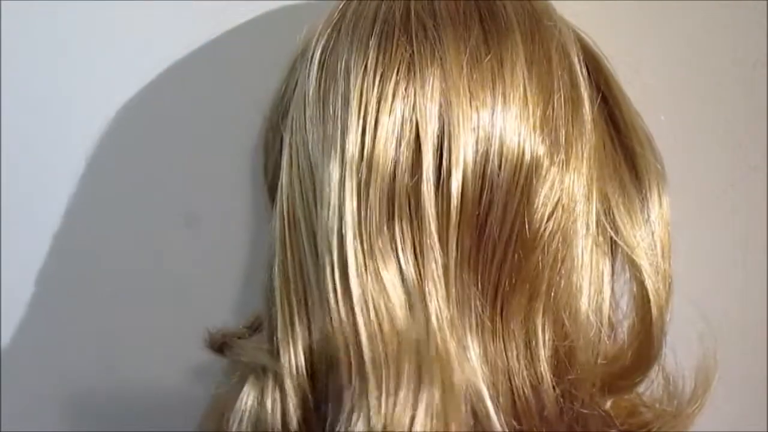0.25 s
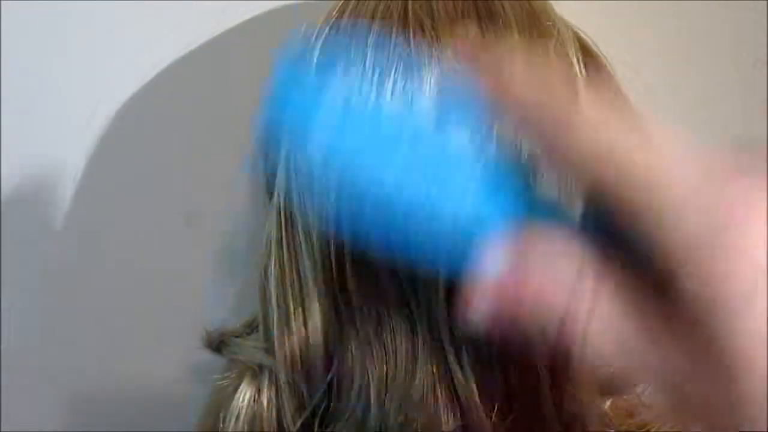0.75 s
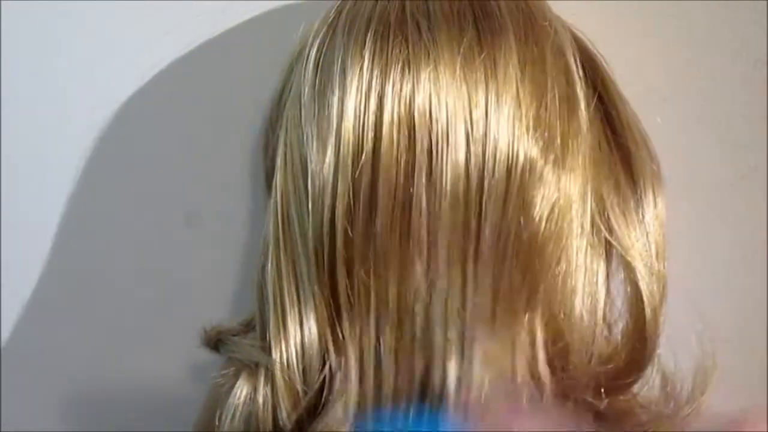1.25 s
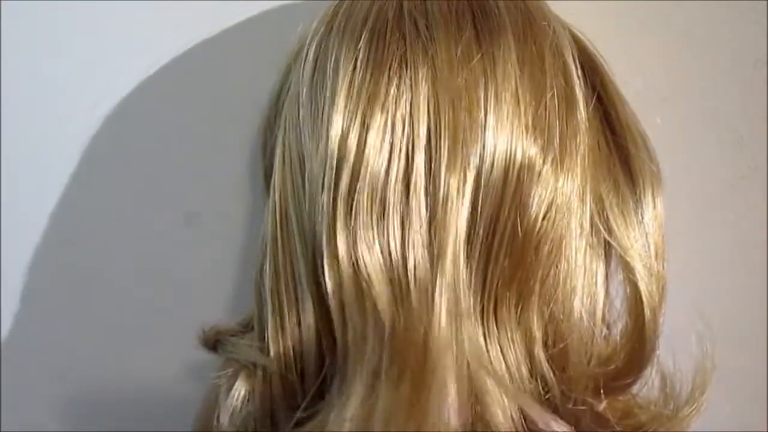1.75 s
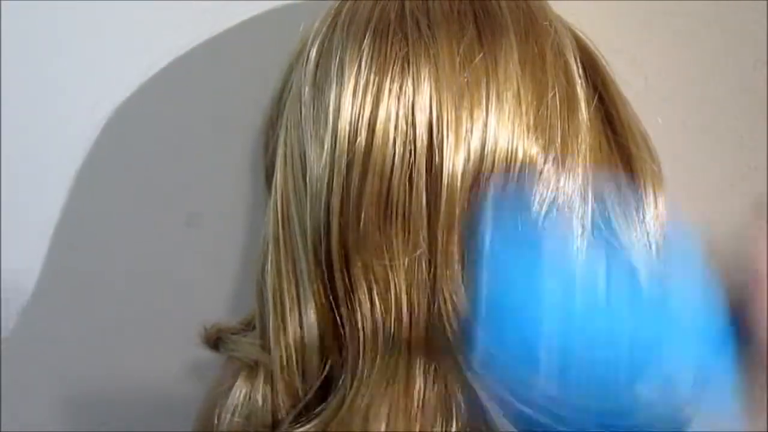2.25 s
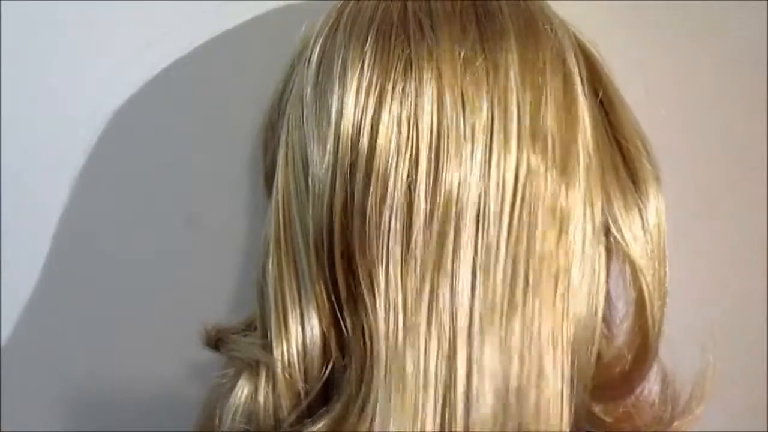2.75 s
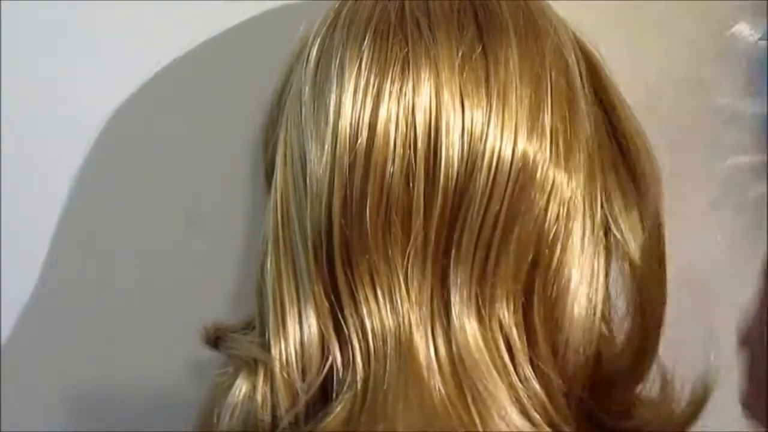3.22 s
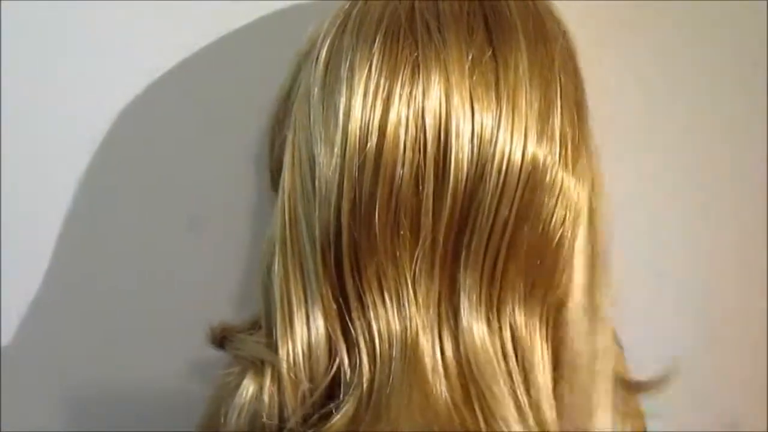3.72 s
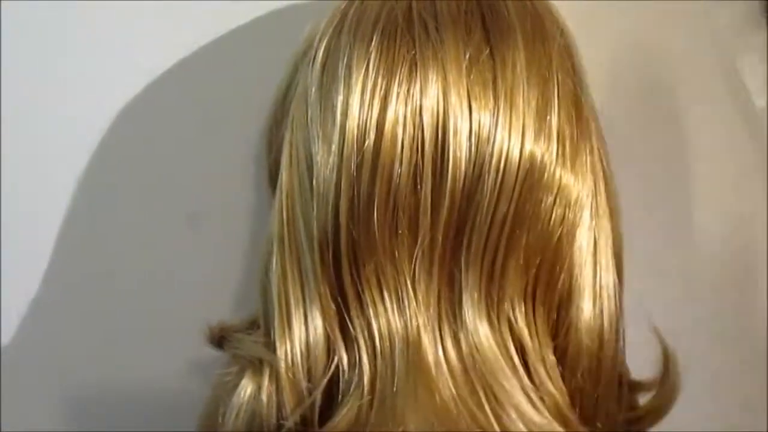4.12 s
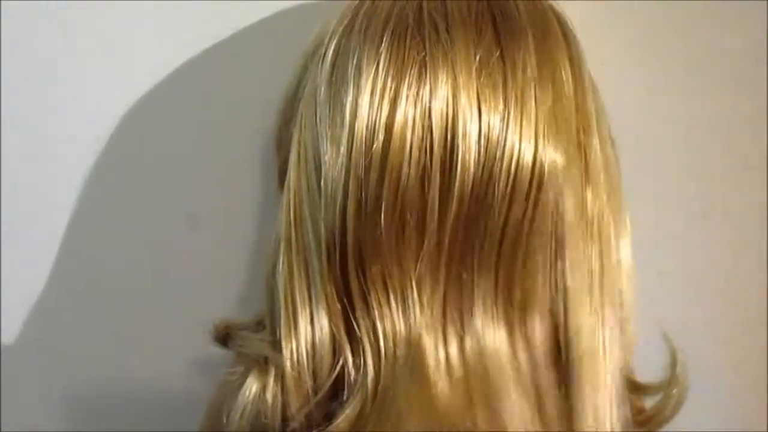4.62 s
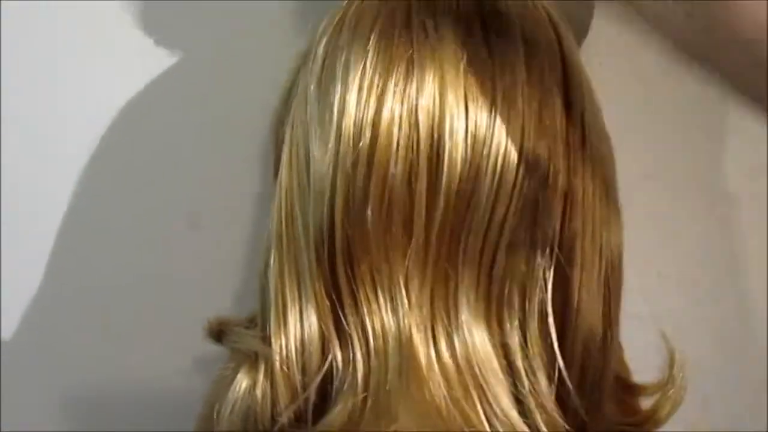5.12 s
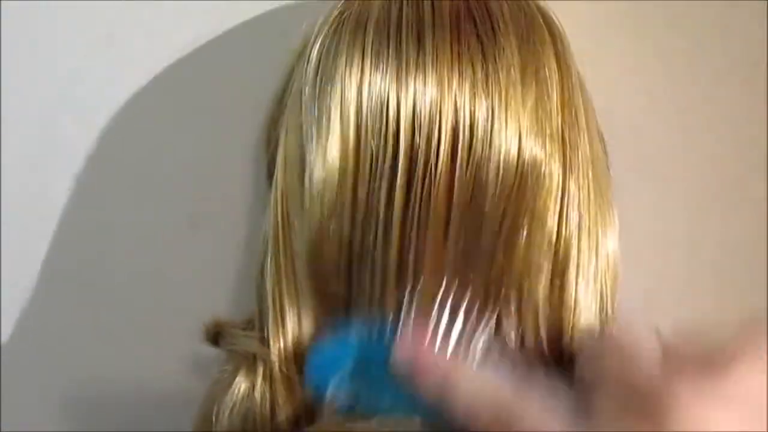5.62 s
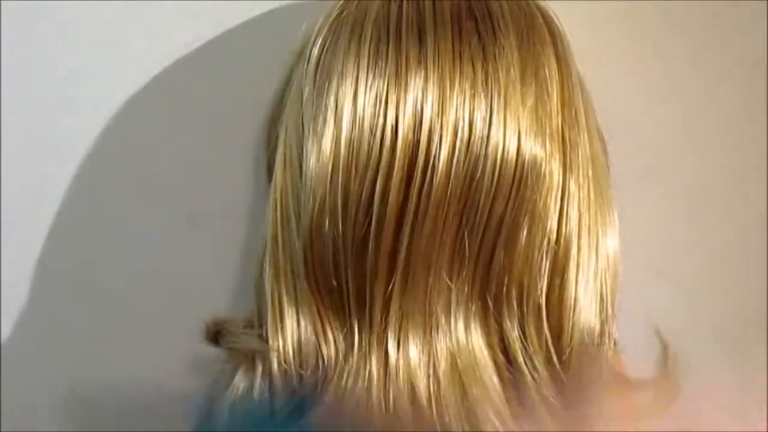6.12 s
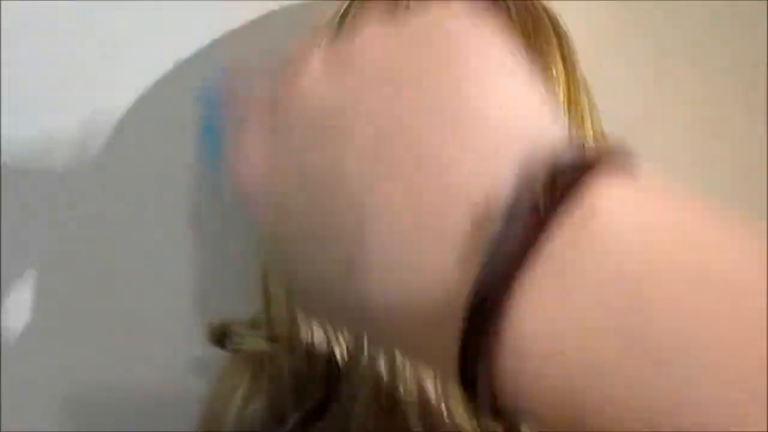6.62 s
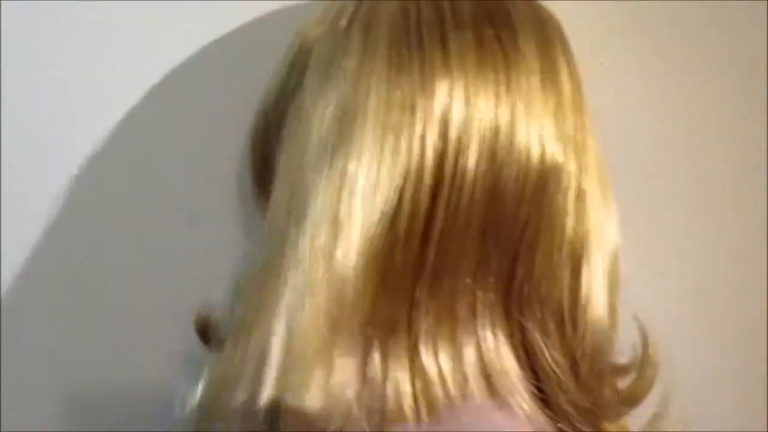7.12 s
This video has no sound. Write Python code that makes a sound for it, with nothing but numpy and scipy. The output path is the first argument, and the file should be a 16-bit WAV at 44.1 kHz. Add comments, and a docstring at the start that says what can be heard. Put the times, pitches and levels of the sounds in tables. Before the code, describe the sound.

Close, dry brushing of artificial hair: soft crackly swishes, small snaps, low bumps of the head, sharp clicks and a thud in a quiet room.

```python
"""A brush stroke already under way hisses through a doll's synthetic hair, close by in a small quiet room.
More strokes follow: slipping fibres hiss as filtered random impulses, snagged pins snap free as short
noise bursts and the tugged head rumbles as low noise. Around the strokes hard plastic knocks and wire
pins click, ringing as decaying sines under a noise crack. One strong thud lands on the table, later two
faint ones. Steady air noise and two faint hums lie beneath."""
import sys
import numpy as np
from scipy import signal
from scipy.fft import rfft, irfft
from scipy.io import wavfile

SR = 44100
rng = np.random.default_rng(int(sys.argv[2]) if len(sys.argv) > 2 else 0)


def store_wav(level_fs):
    """Save 16-bit WAV to argv[1]."""
    pcm = np.round(np.clip(np.atleast_2d(level_fs), -1, 1) * 32767)
    wavfile.write(sys.argv[1], SR, pcm.T.astype(np.int16))


N = 324576
TIME = np.arange(N) / SR          # s
RING_TIME = TIME[:SR // 2]        # s, the half second given to each short sound
CUTOFF_HZ = 15900                 # nothing much is heard above this


# Strokes of the brush. Each row: start in seconds, length in seconds, swish of the pins over the scalp
# at its fastest in relative dB, pull on the head as the pins bite in relative dB.
BRUSH_STROKES = [(0, 0.25, -74, -55), (.99, 0.6, -71, -49.5), (2.51, 0.525, -69, -50),
                 (3.599, 0.3, -65, -48.5), (4.381, 0.29, -66, -41.5), (5.276, 0.71, -72.5, -43.5),
                 (6.492, 0.29, -91, -33), (6.933, 0.45, -72, -50.5)]


def brush_motion():
    """Gains of swish and pull: the brush is fastest near mid-stroke and tugs hardest as it bites."""
    bite_s, leave_s = 0.021, 0.05            # the pins sink in; they leave the hair
    speed_up_s, slow_down_s = 0.07, 0.11     # the swish comes and goes more gently than the pull
    fastest_point = 0.45                     # point along the stroke where the swish peaks, 0-1
    swell_db, ease_db = 6, 10.5              # per stroke length: swish away from its peak, pull from its bite
    speed, pull = np.zeros(N), np.zeros(N)
    for start, length, swish_db, pull_db in BRUSH_STROKES:
        along = np.clip((TIME - start) / length, 0, 1)
        swish_gain = from_db(swish_db - swell_db * abs(along - fastest_point))
        pull_gain = from_db(pull_db - ease_db * along)
        speed += held(start, length, speed_up_s, slow_down_s) * swish_gain
        pull += held(start, length, bite_s, leave_s) * pull_gain
    return speed, pull


# Loose lengths of hair sliding over one another. Each row: start in seconds, length in seconds, hiss in dB.
HAIR_SLIDES = [(0, .14, -65.5), (0.277, 0.12, -64), (0.98, 0.12, -67), (1.294, 0.3, -66.5),
               (1.69, 0.061, -68), (1.96, 0.055, -58.5), (2.53, 0.46, -64.5), (2.777, 0.074, -67),
               (3.655, 0.29, -74), (4.45, 0.29, -66.5), (5.316, 0.66, -64), (6.76, 0.2, -70),
               (6.964, 0.41, -63)]


def sliding_lengths():
    """Gain of the hiss of the loose lengths: each slide rises, holds and dies away."""
    slides = [from_db(db) * held(start, length, rise=0.083, fall=0.058) for start, length, db in HAIR_SLIDES]
    return sum(slides)


# Colour of the swish over the scalp. Each row: frequency in Hz, density in relative dB per Hz.
SWISH_COLOUR = [(400, 9), (1200, 3.5), (2500, 1.5), (4000, 0), (8400, 5), (11500, -2), (15500, -30)]
# Resonances that colour the hiss of the loose lengths. Each row: centre in Hz, width in Hz, relative dB.
HAIR_RESONANCES = [(4600, 280, 2.5), (5500, 550, 3.5), (6300, 380, 4.5), (7030, 170, 4)]


def hair(speed, pull):
    """A broad swish over the scalp, a wandering hiss down the lengths, crackle where the brush pulls."""
    swish_gain = speed * from_db(2 + drift(40))
    swish = swish_gain * coloured(slips(per_s=8000, size_db=4.5), SWISH_COLOUR)

    lengths = 0
    for hz, width, db in HAIR_RESONANCES:
        b, a = signal.iirpeak(hz, hz / width, fs=SR)
        band = signal.lfilter(b, a, slips(per_s=6500, size_db=5.5))
        waver_db = 2.4 * drift(12) + 1.8 * drift(70)
        lengths = lengths + from_db(db + waver_db) * rms_one(band)
    hiss = sliding_lengths() * rms_one(lengths)

    snags = slips(per_s=130, size_db=2) * from_db(2.3 * drift(30))
    # every snag rattles the pin bed for a few milliseconds
    pin_noise = rng.standard_normal(len(RING_TIME)) * fade(0.02)
    pin_bed = coloured(pin_noise, [(600, 0), (2700, 0), (6000, -5), (9000, -16)])
    rattle = rms_one(signal.fftconvolve(snags, pin_bed)[:N])
    crackle = from_db(-4) * np.sqrt(speed * pull) * rattle
    return swish + hiss + crackle


# Pins snapping free of tangles. Each row: start in seconds, level in relative dB, favoured register in Hz.
PIN_SNAPS = [(1.0623, -35, 3440), (1.2706, -40.5, 9000), (2.534, -35, 1580), (2.5953, -32.5, 3170),
             (2.692, -24, 2600), (2.7001, -31, 3220), (2.7173, -26.5, 6200), (3.0005, -37, 2170),
             (4.461, -33, 2670), (4.48, -33.5, 2400), (4.5647, -34, 2140), (4.5774, -37, 4230),
             (4.6, -32.5, 4530), (4.616, -37, 4600), (5.229, -44, 6000), (5.399, -37.5, 3340),
             (5.4502, -37.5, 1990), (5.4999, -40, 1990), (5.528, -35.5, 4500), (5.833, -38.5, 2330),
             (6.483, -43, 3500), (6.491, -35.5, 1510), (6.954, -36.5, 3130)]
# Shared colour of the snaps. Each row: frequency in Hz, density in relative dB per Hz.
SNAP_SPECTRUM = [(200, 18.5), (700, 12), (1500, 4), (2700, -1.5), (4000, -5.5), (5200, -3.5), (8000, -8),
                 (11000, -12.5), (15500, -23.5)]


def pin_snaps():
    """A pin bends in a tangle and springs free; each favours its own register."""
    register_slope_db = 6.8      # per octave away from the favoured register
    out = np.zeros(N)
    for s, db, centre_hz in PIN_SNAPS:
        colour = [(hz, level - register_slope_db * abs(np.log2(hz / centre_hz)))
                  for hz, level in SNAP_SPECTRUM]
        snap = burst(colour, t60=0.024, tail_db=-10, tail_t60=0.12, tail_tilt_db=-4)
        add(out, s, from_db(db - 7) * snap)
    return out


# Brief swells of rustle and swish. Each row: middle in seconds, level in dB, centre in Hz,
# spread in time in seconds.
RUSTLE_SWELLS = [(1.155, -73, 9500, 0.026), (2.614, -52.5, 4640, .01), (2.954, -55.5, 1330, 0.015),
                 (3.543, -55.5, 3680, .012), (4.49, -53.5, 2400, 0.012), (4.625, -61, 5450, 0.016),
                 (5.016, -62, 714, 0.11), (5.36, -65, 4550, 0.011), (5.64, -65, 9500, 0.044),
                 (5.712, -53.5, 1070, .016)]


def rustles():
    """Brief swells of rustle and swish: random slips, each time in one broad register."""
    out = np.zeros(N)
    for s, db, hz, spread in RUSTLE_SWELLS:
        colour = [(hz / 2, -9), (hz, 0), (hz * 2, -13)]
        noise = coloured(slips(per_s=6000, size_db=2.5), colour)
        swell = np.exp(-0.5 * ((TIME - s) / spread) ** 2)
        out += from_db(db) * noise * swell
    return out


# Soft bumps of head and stand. Each row: start in seconds, peak of the swell in dB, pitch in Hz.
HEAD_BUMPS = [(0.189, -33.5, 57.4), (2.432, -41, 218.5), (2.471, -43, 225), (2.551, -34.5, 60),
              (2.605, -29.5, 62.6), (2.956, -36.5, 65), (4.256, -39, 222), (4.333, -37, 222.5),
              (4.739, -49, 221), (5.16, -38, 226.5), (5.24, -35, 62.6), (6.154, -36.5, 108),
              (6.487, -22.5, 75), (6.541, -28, 57), (6.66, -27.5, 59.7)]


def handling(pull):
    """The pull of the brush shakes the head; soft bumps swell and die at one pitch."""
    shake_colour = [(40, 1.5), (62, 16.5), (90, 10.5), (150, 2), (300, -35)]
    shake = coloured(rng.standard_normal(N), shake_colour)
    restless_pull = pull + from_db(-58.5)      # the head never stands quite still
    out = from_db(-2) * restless_pull * shake
    age = RING_TIME / 0.011                    # the bump peaks after 11 ms
    swell = age * np.exp(1 - age)
    for s, db, hz in HEAD_BUMPS:
        add(out, s, from_db(db) * swell * np.sin(2 * np.pi * hz * RING_TIME))
    return out


# Knocks on hollow plastic. Each row: start in seconds, level in relative dB, how strongly the broad face
# answers in dB, how freely the plastic rings in dB.
PLASTIC_KNOCKS = [(0.4474, -15, -5.5, 0), (2.108, -12, -1.5, -6.5), (2.149, -30, 2, -6.5),
                  (2.164, -31.5, 11.5, -6.5)]
# Modes of the plastic. Each row: frequency in Hz, level in relative dB, decay time t60 in seconds.
PLASTIC_MODES = [(230, -5, .15), (328, -14, .1), (495, -17, .08), (790, -9, .07), (1020, -11, .08),
                 (1370, -6, .06), (1450, -3, .07), (1545, -11, .08), (1990, -3, .07), (2185, -8, .06),
                 (2390, -10, .05), (2570, -11, .05), (3350, -17, .07), (5580, -15, .05)]
# Colour of the crack of a knock. Each row: frequency in Hz, density in relative dB per Hz.
KNOCK_SPECTRUM = [(150, 3.5), (250, 4), (600, -1.5), (1300, 2.5), (2300, -3), (3800, -15), (5600, -15),
                  (8000, -23), (15000, -57)]


def knocks():
    """Hollow plastic rings under a short crack; the spot struck decides how much its face joins in."""
    out = np.zeros(N)
    for s, db, face_db, ring_db in PLASTIC_KNOCKS:
        modes = [(hz, level + face_db * face_share(hz), t60) for hz, level, t60 in PLASTIC_MODES]
        colour = [(hz, level + face_db * face_share(hz)) for hz, level in KNOCK_SPECTRUM]
        crack = burst(colour, t60=0.077, tail_db=-19.5, tail_t60=0.27, tail_tilt_db=0.5)
        body = ring(modes, spread_db=2.5, low_hz=130, contact_hz=9000)
        add(out, s, from_db(db) * (from_db(ring_db) * body + from_db(-6) * crack))
    return out


def face_share(hz):
    """How far a frequency belongs to the broad face of the plastic, 0-1."""
    return np.exp(-3 * np.log2(hz / 1100) ** 2)


# Wire pins clicking on something hard. Each row: start in seconds, level in relative dB.
PIN_CLICKS = [(.440, -29), (0.447, -34), (2.107, -42), (2.14, -45), (2.158, -45), (6.022, -31),
              (6.0249, -31), (6.6171, -40)]
# Colour of the click. Each row: frequency in Hz, density in relative dB per Hz.
CLICK_SPECTRUM = [(200, 7.5), (600, -14), (2200, -2), (3100, -16), (3450, 0), (3800, -10), (4400, 0.5),
                  (5750, 0.5), (6600, -7.5), (11000, -14.5), (12900, -10.5), (13450, -8.5), (14100, -15),
                  (15500, -17)]
# Pins that sing on after a click. Each row: frequency in Hz, level in relative dB, decay time t60 in seconds.
SINGING_PINS = [(4480, -16, .17), (5670, -16, 0.15), (13450, -25, 0.13), (13700, -24, .17)]


def clicks():
    """The bed of wire pins rings briefly and brightly, a few modes singing on."""
    out = np.zeros(N)
    for s, db in PIN_CLICKS:
        sing = ring(SINGING_PINS, spread_db=1.5, low_hz=1500, contact_hz=15500)
        tick = burst(CLICK_SPECTRUM, t60=0.047, tail_db=-7.5, tail_t60=0.15, tail_tilt_db=-1)
        add(out, s, from_db(db) * (tick + sing))
    return out


# The brush back clacking against the head. Each row: start in seconds, level in relative dB.
BRUSH_CLACKS = [(6.6161, -30), (6.6565, -26), (6.6779, -26.5)]
# Colour of the clack. Each row: frequency in Hz, density in relative dB per Hz.
CLACK_SPECTRUM = [(400, -13), (900, -7.5), (1800, -3), (2750, 5), (3300, 1), (4000, -4), (5200, -7),
                  (8000, -17.5), (15000, -45)]


def clacks():
    """Small, stiff plastic answers with a dry crack."""
    out = np.zeros(N)
    for s, db in BRUSH_CLACKS:
        clack = burst(CLACK_SPECTRUM, t60=0.029, tail_db=-16.5, tail_t60=0.18, tail_tilt_db=-2.5)
        add(out, s, from_db(db) * clack)
    return out


# Thuds on the table. Each row: start in seconds, level in relative dB.
TABLE_THUDS = [(3.4208, -15.5), (6.92, -53), (6.949, -45)]
# Modes of the table top. Each row: frequency in Hz, level in relative dB, decay time t60 in seconds.
TABLE_MODES = [(199, -10, 0.13), (280, -8, 0.14), (377, 0, 0.11), (468, -7, 0.098), (581, -9, 0.18),
               (716, -16, 0.18), (818, -2, 0.085), (991, -12, 0.12), (1104, -20, 0.17), (1303, -11, 0.12),
               (1480, -25, 0.15)]
# Colour of the crack of a thud. Each row: frequency in Hz, density in relative dB per Hz.
THUD_SPECTRUM = [(120, -9.5), (300, -2.5), (700, 3), (1300, -5), (1800, -12.5), (2500, -15.5),
                 (4000, -34.5), (7000, -37.5), (13000, -50)]


def thuds():
    """One short push on the table top, which answers with low, close modes."""
    out = np.zeros(N)
    age = (RING_TIME - 0.0011) / 0.00025      # the push swings through zero at 1.1 ms
    push = age * np.exp(-age ** 2 / 2)
    for s, db in TABLE_THUDS:
        crack = burst(THUD_SPECTRUM, t60=0.085, tail_db=-21, tail_t60=0.29, tail_tilt_db=-3)
        body = ring(TABLE_MODES, spread_db=4.5, low_hz=231, contact_hz=3500)
        add(out, s, from_db(db) * (from_db(2) * push + from_db(1.5) * body + from_db(2.5) * crack))
    return out


# Colour of the air noise. Each row: frequency in Hz, density in relative dB per Hz.
AIR_SPECTRUM = [(12, -36.5), (20, -1), (67, -1), (88, -22), (123, -3.5), (146, -17), (210, -11.5),
                (277, -18), (328, -17.5), (367, -19), (513, -21), (1190, -25), (3250, -34.5), (3530, -35),
                (16000, -50.5)]
# Steady room hums. Each row: frequency in Hz, rms level in dB.
ROOM_HUMS = [(27, -54.5), (120, -61.5)]


def room_tone():
    """Steady air noise and faint hums."""
    air = from_db(-51) * coloured(rng.standard_normal(N), AIR_SPECTRUM)
    hums = sum(from_db(db) * np.sqrt(2) * np.sin(2 * np.pi * hz * TIME) for hz, db in ROOM_HUMS)
    return air + hums


def slips(per_s, size_db):
    """Fibres slip at random, a few of them much harder; rms 1."""
    hardness = np.minimum(rng.exponential(1, N), 3)
    sizes = from_db(size_db * hardness) * rng.choice([-1, 1], N)
    return rms_one(sizes * (rng.random(N) < per_s / SR))


def burst(spectrum, t60, tail_db, tail_t60, tail_tilt_db):
    """Crowded modes of a contact die fast; the room holds them longer, tilted per octave."""
    direct, scattered = rng.standard_normal((2, len(RING_TIME)))
    in_room = [(hz, db + tail_tilt_db * np.log2(hz)) for hz, db in spectrum]
    contact = coloured(direct * fade(t60), spectrum)
    tail = coloured(scattered * fade(tail_t60), in_room)
    return contact + from_db(tail_db) * tail


def ring(modes, spread_db, low_hz, contact_hz):
    """One blow sets the modes ringing; a soft contact limits the top, small size the bass."""
    signs = (-1) ** np.arange(len(modes))
    strengths = signs * from_db(spread_db * rng.standard_normal(len(modes)))
    rings = sum(strength * from_db(db) * fade(t60) * np.sin(2 * np.pi * hz * RING_TIME)
                for strength, (hz, db, t60) in zip(strengths, modes))
    band = [low_hz, min(contact_hz, CUTOFF_HZ)]
    return signal.sosfilt(signal.butter(2, band, "band", fs=SR, output="sos"), rings)


def coloured(x, spectrum):
    """Causal filter of unit energy; its spectrum falls away beyond both ends."""
    hz, db = np.transpose(spectrum)
    bins = np.maximum(np.fft.rfftfreq(len(x), 1 / SR), 1)
    skirts = np.minimum(np.minimum(bins / hz[0], hz[-1] / bins), 1) ** 2
    gain = rms_one(skirts * from_db(np.interp(np.log(bins), np.log(hz), db)))
    cepstrum = irfft(np.log(gain), len(x))
    cepstrum[1:len(x) // 2] *= 2      # minimum phase: nothing sounds before its cause
    cepstrum[len(x) // 2 + 1:] = 0
    return irfft(rfft(x) * np.exp(rfft(cepstrum)), len(x))


def held(start, length, rise, fall):
    """Smooth attack around the start, hold, smooth release around the end; 0-1, times in seconds."""
    attack = 1 + np.tanh(2 * (TIME - start) / rise)
    release = 1 - np.tanh(2 * (TIME - start - length) / fall)
    return attack * release / 4


def drift(rate):
    """Slow random wander of rms 1, through a new value rate times a second."""
    knots = rng.standard_normal(int(TIME[-1] * rate) + 2)
    return rms_one(np.interp(TIME * rate, np.arange(len(knots)), knots))


def fade(t60):
    """Exponential decay from 1, down 60 dB after t60 seconds."""
    return np.exp(-np.log(1000) * RING_TIME / max(t60, 1e-3))


def add(out, s, sound):
    """Mix a sound in at a time in seconds."""
    start = max(round(s * SR), 0)
    out[start:start + len(sound)] += sound[:N - start]


def from_db(db):
    """Decibels to gain."""
    return 10 ** (np.asarray(db) / 20)


def rms_one(x):
    """Scale to unit rms."""
    return x / np.sqrt(np.mean(x ** 2) + 1e-20)


def scene():
    """Brushing, blows and room are summed into one close mono signal."""
    speed, pull = brush_motion()
    brushing = hair(speed, pull) + pin_snaps() + rustles() + handling(pull)
    blows = knocks() + clicks() + clacks() + thuds()
    return (brushing + blows + room_tone())[None]


def record(dry):
    """The top is cut steeply."""
    return signal.sosfilt(signal.ellip(10, 0.2, 70, CUTOFF_HZ, fs=SR, output="sos"), dry)


dry = scene()
out = record(dry)
store_wav(out)
```